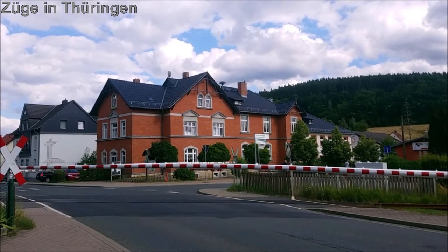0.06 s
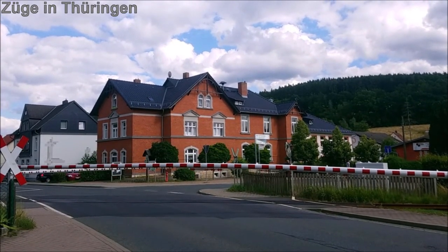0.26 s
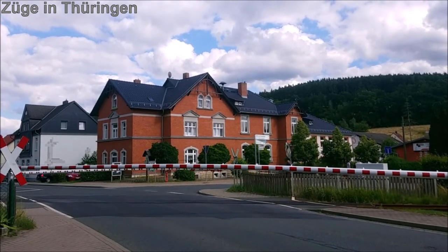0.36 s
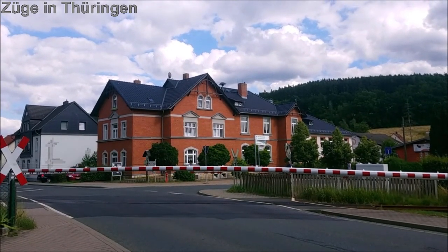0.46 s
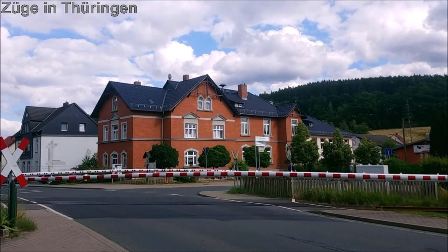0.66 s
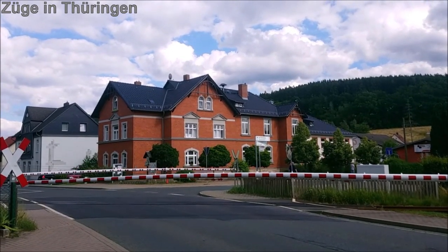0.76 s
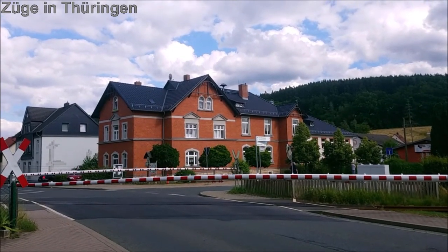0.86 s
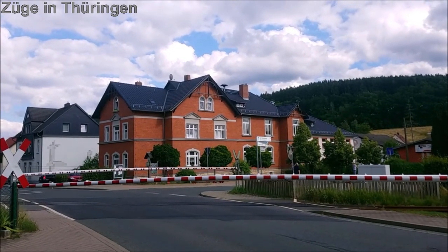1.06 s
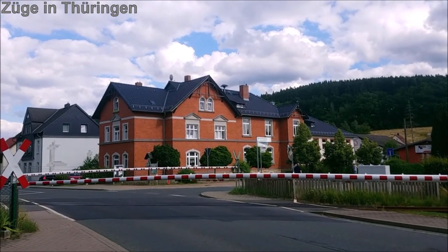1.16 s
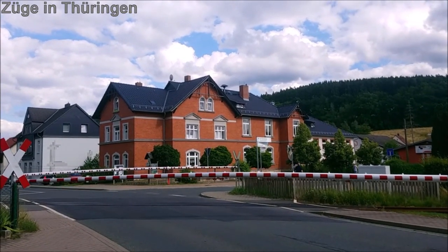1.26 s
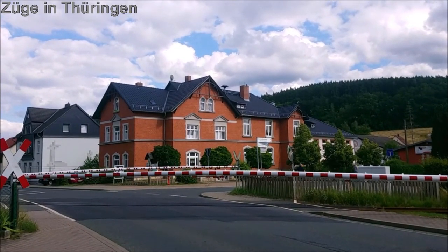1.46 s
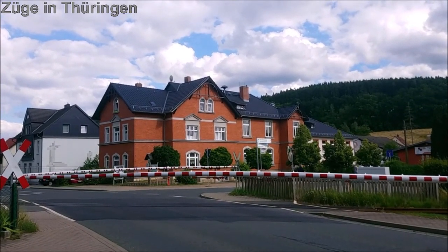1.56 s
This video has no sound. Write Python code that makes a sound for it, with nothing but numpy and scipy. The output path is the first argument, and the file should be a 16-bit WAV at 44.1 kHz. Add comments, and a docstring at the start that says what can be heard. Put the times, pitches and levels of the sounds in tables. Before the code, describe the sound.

A level crossing barrier comes down outdoors with hollow thuds, clacking joints and bell-like metal strikes. It lands with a clang, rattles and settles, with a short street echo over low wind and distant traffic.

```python
"""A street at a level crossing. The barrier comes down: its hollow boom flexes and thuds, slack linkage
joints clack, rubbing steel squeaks, and a loose steel rod is struck and rings like a bell. The boom lands
on its steel rest with a clang and sharp snaps, rattles and settles. House fronts answer with a short
diffuse echo; wind and far traffic rumble underneath."""
import sys
import numpy as np
from scipy import signal
from scipy.fft import rfft, irfft, next_fast_len
from scipy.io import wavfile
from scipy.ndimage import map_coordinates

SR = 44100
rng = np.random.default_rng(int(sys.argv[2]) if len(sys.argv) > 2 else 0)


def dump(signal):
    """Clip the signal to [-1, 1] and save it as 16-bit WAV at the path in sys.argv[1]."""
    limited = np.clip(np.atleast_2d(signal).T, -1, 1)
    pcm = np.round(limited * 32767).astype(np.int16)
    wavfile.write(sys.argv[1], SR, pcm)


N = 70560

# boom contacts on its rest: (time [s], level [dB])
LANDINGS = [(.799, -25), (0.8047, -19), (0.808, -21.5), (0.8144, -22.5)]
# phase of left ahead of right: (frequency [Hz], lead [rad])
LEFT_LEAD = [(100, -0.5), (800, 0.7), (1300, 1.6), (2400, 2), (4000, 1.5), (12000, -0.5)]


def amp(db):
    """Decibels to gain."""
    return 10 ** (np.asarray(db) / 20)


def unit(x):
    """Scale to rms 1."""
    return x / np.sqrt(np.mean(x ** 2) + 1e-20)


def along(points, hz):
    """Interpolate (Hz, value) points on a log frequency axis."""
    knots_hz, values = np.transpose(points)
    return np.interp(np.log(hz + 1), np.log(knots_hz + 1), values)


def clock():
    """Seconds at each sample."""
    return np.arange(N) / SR


def wobble(knots_per_s):
    """Smooth random curve."""
    return map_coordinates(rng.standard_normal(N // 8), [clock() * knots_per_s], mode="wrap")


def onset(rise_s):
    """Sine-squared attack."""
    return np.sin(np.pi / 2 * np.minimum(clock() / max(rise_s, 1e-4), 1)) ** 2


def until(length_s, contact_s=0.0032):
    """Gate: free ringing, then stopped by the next contact."""
    return np.clip(1 - (clock() - length_s) / contact_s, 0, 1)


def add(out, start_s, x):
    """Mix x into out from start_s on."""
    i = max(round(start_s * SR), 0)
    out[:, i:] += x[:, :N - i]


def shelves(hz, treble_db, bass_db):
    """Extra dB above 4 kHz and below 550 Hz."""
    return treble_db * (1 - 1 / (1 + (hz / 4000) ** 4)) + bass_db / (1 + (hz / 550) ** 8)


def stereo(hz, lead_rad):
    """Complex gains of the left and right channel."""
    # balance: (frequency [Hz], left over right [dB])
    balance = [(60, 5), (350, 4), (800, 2.5), (2000, 3.5), (4500, 0), (10000, -2.8)]
    return np.exp(np.array([[.5], [-.5]]) * (np.log(amp(along(balance, hz))) + 1j * lead_rad))


def noise(colour, treble_db=0, bass_db=0):
    """Coloured, partly coherent stereo noise; rms 1 before the shelves."""
    # left-right likeness: (frequency [Hz], coherence [0..1])
    coherence = [(60, 0.59), (130, 0.38), (300, 0.75), (750, 0.77), (1400, 0.34), (2400, 0.87),
                 (4000, 0.45), (12000, 0.034)]
    hz = np.fft.rfftfreq(N, 1 / SR)
    mid, side = rfft(rng.standard_normal((2, N)))
    width_rad = np.arccos(np.clip(along(coherence, hz), -1, 1)) / 2
    white = np.cos(width_rad) * mid + np.array([[1], [-1]]) * np.sin(width_rad) * side
    pair = white * amp(along(colour, hz)) * stereo(hz, along(LEFT_LEAD, hz))
    return irfft(pair * amp(shelves(hz, treble_db, bass_db)), N) / np.std(irfft(pair, N))


def tone(hz, lead_rad, drift_rad):
    """Phase-modulated stereo partial."""
    phase = 2 * np.pi * hz * clock() + drift_rad
    return np.sqrt(2) * np.imag(stereo(hz, lead_rad) * np.exp(1j * phase))


def burst(colour, t60_s, echo_db, treble_db=0, bass_db=0, chatter_db=0):
    """Dense modes die fast, then linger in the street, the treble least; chatter shakes the level."""
    # echo off the house fronts: (frequency [Hz], t60 [s])
    street = [(200, 1.8), (900, 1.67), (2400, 0.89), (5000, 0.73), (12000, 0.46)]
    hz, t, spectrum = signal.stft(noise(colour, treble_db, bass_db), SR, nperseg=256)
    direct = amp(-60 * t / t60_s)
    echo = amp(echo_db - 60 * t / along(street, hz)[:, None])
    decayed = signal.istft(spectrum * np.hypot(direct, echo), SR, nperseg=256)[1][:, :N]
    return decayed * unit(amp(chatter_db * wobble(410)))


def ring(modes, bass_db=0, stretch=1, scatter_db=1.5):
    """One blow on damped modes, each with random phase and level scatter."""
    out, t = np.zeros((2, N)), clock()[:N // 3]
    for hz, db, t60_s in modes:
        gain = amp(db + scatter_db * rng.standard_normal() + shelves(hz, 0, bass_db))
        phase = 2 * np.pi * (stretch * hz * t + rng.random())
        wave = gain * np.exp(1j * phase - np.log(1000) * t / t60_s)
        out[:, :len(t)] += np.imag(stereo(hz, along(LEFT_LEAD, hz)) * wave)
    return out


def outdoors(air_db=-49):
    """Steady air and a swelling rumble of wind and far traffic."""
    # noise spectra: (frequency [Hz], relative density [dB])
    air_colour = [(15, -42), (25, -9), (70, -16.5), (137, -2), (166, -19), (236, -5.5), (270, -9),
                  (503, -8), (560, -11.5), (624, -3.5), (677, -10.5), (2160, -15.5), (8140, -45.5),
                  (13600, -32), (16000, -44)]
    rumble_colour = [(25, -11.5), (45, -13.5), (70, -2), (115, -6.5), (170, -9.5), (300, -20), (1000, -40)]
    # rumble swell: (time [s], level [dB])
    swell = [(0, -54.5), (.2, -58), (.36, -46.5), (.5, -53.5), (.9, -53.5), (1.3, -47.5), (1.6, -54)]
    rumble_db = np.interp(clock(), *np.transpose(swell))
    return amp(air_db) * noise(air_colour) + amp(rumble_db) * noise(rumble_colour)


def squeaks(rise_s=0.0027, t60_s=0.036, waver_rad=0.45):
    """Rubbing steel holds one high mode for a moment."""
    # joint rubs: (time [s], length [s], frequency [Hz], level [dB])
    rubs = [(.555, 0.0086, 3600, -43), (0.68, 0.041, 3760, -30.5), (.709, 0.0098, 3840, -35),
            (1.134, 0.0032, 9770, -43.5), (1.135, 0.0055, 11100, -49)]
    out, t = np.zeros((2, N)), clock()
    for start_s, length_s, hz, db in rubs:
        release = np.exp(-np.log(1000) * np.maximum(t - length_s, 0) / t60_s)
        mode = tone(hz, lead_rad=1.0, drift_rad=waver_rad * wobble(225))
        add(out, start_s, amp(db) * onset(rise_s) * release * mode)
    return out


def snaps():
    """Hard steel-on-steel contacts give short bright cracks."""
    # contacts: (time [s], level [dB])
    contacts = [(0.546, -45), (0.6798, -30), (0.8022, -26), (0.809, -28), (0.8158, -41), (0.833, -36.5),
                (0.923, -41.5), (1.136, -32.5), (1.1455, -40), (1.161, -45)]
    # crack spectrum: (frequency [Hz], relative density [dB])
    colour = [(800, -15), (2000, -19), (4500, 1), (8000, -4), (11000, 0.5), (16000, -2)]
    out = np.zeros((2, N))
    for start_s, db in contacts:
        crack = burst(colour, t60_s=0.035, echo_db=-24, chatter_db=6.5)
        add(out, start_s, amp(db) * onset(0.001) * crack)
    return out


def linkage(modes_db=-6):
    """Slack joints clack and ring briefly as the boom sways."""
    # joint impacts: (time [s], level [dB], rise [s], treble shelf [dB])
    clacks = [(.206, -30.5, 0.0027, -1), (.221, -27.5, 0.0042, -10.5), (.368, -32, 0.0055, 4),
              (.378, -24, 0.003, -6.5), (.398, -35.5, .004, -13), (.548, -39.5, 0.0017, 2),
              (.626, -35, 0.0055, -6), (.655, -40, .004, -13), (1.089, -31.5, .008, -5),
              (1.136, -35, 0.0011, -1.5), (1.16, -48.5, 0.0024, 5), (1.213, -39, 0.011, -2)]
    # linkage modes: (frequency [Hz], level [dB], t60 [s])
    modes = [(2110, -5, 0.16), (2215, -0.5, 0.3), (2230, -18, 0.14), (2380, -9, 0.19), (2370, 3, .16),
             (4500, -19, 0.092)]
    # its dense modes: (frequency [Hz], relative density [dB])
    colour = [(150, -26), (700, -7), (1200, -9), (1500, -13), (1750, -3), (1930, -5), (2200, -1.5),
              (2430, 0), (2900, -10), (4400, -16), (6500, -28), (11000, -27), (16000, -37)]
    out = np.zeros((2, N))
    for start_s, db, rise_s, treble_db in clacks:
        dense = burst(colour, t60_s=0.19, echo_db=-10.5, treble_db=treble_db, chatter_db=1.5)
        add(out, start_s, amp(db) * onset(rise_s) * (dense + amp(modes_db) * ring(modes)))
    return out


def boom(modes_db=-4, dense_db=-3, supported_stretch=1.0277):
    """Each flex of the hollow boom rings its low modes, a little higher once it lies on its rest."""
    # flexes: (time [s], level [dB], rise [s], bass shelf [dB])
    thuds = [(.206, -34.5, .003, -0.5), (.221, -23.5, 0.011, -1.5), (.262, -33.5, 0.0049, -9),
             (.372, -37.5, 0.017, 14.5), (.387, -24.5, 0.019, 0), (.553, -34.5, 0.0033, -3),
             (.597, -34, 0.008, -7), (.613, -28, 0.0081, 1.5), (.806, -37.5, 0.0053, 14.5),
             (.828, -33.5, 0.003, 11), (.9, -34.5, 0.0035, -3), (1.091, -31.5, 0.0028, -2.5),
             (1.109, -27, 0.0046, 0.5), (1.144, -40, 0.0041, 1), (1.31, -41, .01, -17)]
    # free boom modes: (frequency [Hz], level [dB], t60 [s])
    modes = [(254.5, -17, 0.65), (282, -13.5, 0.17), (313.6, -11.5, 0.29), (372, -15.5, 0.24),
             (413, -8.5, 0.29), (461.2, -4.5, 0.19), (573, -15, 0.58), (649, -19, 0.31), (709.3, -3, 0.17),
             (777, -4.5, 0.18), (834, -2.5, 0.39), (856, -3.5, 0.18), (901, -6, 0.19), (1002, -14, 0.28),
             (1153, -12.5, 0.61)]
    # its dense modes: (frequency [Hz], relative density [dB])
    colour = [(60, -19.5), (190, -16), (255, -6), (470, -5.5), (570, -17), (820, 1), (1000, -7.5),
              (1300, -8), (2000, -12.5), (5000, -41)]
    out = np.zeros((2, N))
    for start_s, db, rise_s, bass_db in thuds:
        landed = start_s > LANDINGS[0][0]
        body = ring(modes, bass_db, stretch=supported_stretch if landed else 1)
        dense = burst(colour, t60_s=0.075, echo_db=-11.5, bass_db=bass_db)
        add(out, start_s, amp(db) * onset(rise_s) * (amp(modes_db) * body + amp(dense_db) * dense))
    return out


def landing():
    """The boom clangs on its rest, rattles, and rattles again softly after the rebound."""
    # steel rest modes: (frequency [Hz], level [dB], t60 [s])
    modes = [(1133, -7.5, 0.14), (1322, -3.5, 0.13), (1397, -3.5, .07), (1458, 2.5, 0.048), (1522, 2.5, .1),
             (1700, -8, .08), (1944, -12, 0.14), (2434, -16, 0.076)]
    # rattle impacts: (time [s], level [dB], rise [s], treble shelf [dB])
    rattles = [(0.7977, -25.5, 0.00052, -5), (0.8036, -25.5, 0.00091, 8.5), (.827, -21, .004, 1),
               (.843, -23.5, 0.0036, -5), (.863, -24, 0.0072, 1.5), (0.881, -21.5, 0.003, -2),
               (.902, -23, 0.0033, -2.5), (.918, -23.5, .003, 0.5), (.946, -26.5, 0.0072, 3),
               (.966, -24, 0.0035, -7), (.986, -29, 0.0037, -12), (1.289, -31.5, 0.0082, -8.5),
               (1.312, -31.5, .004, -4.5), (1.334, -36, 0.0043, -8), (1.366, -35.5, 0.0055, -11),
               (1.443, -37.5, 0.013, -13), (1.467, -37.5, 0.0014, -4.5)]
    # rattle spectrum: (frequency [Hz], relative density [dB])
    colour = [(120, -60), (280, -25), (450, -8.5), (680, -20.5), (900, -3), (1130, -7), (1400, -0.5),
              (1850, -7), (2400, 1), (3000, -11), (3900, -9), (7000, -28), (11000, -25.5), (16000, -32)]
    out = np.zeros((2, N))
    stops_s = [row[0] for row in LANDINGS[1:]] + [N / SR]
    for (start_s, db), stop_s in zip(LANDINGS, stops_s):
        add(out, start_s, amp(db) * onset(0.0007) * until(stop_s - start_s) * ring(modes))
    for start_s, db, rise_s, treble_db in rattles:
        rattle = burst(colour, t60_s=0.17, echo_db=-15, treble_db=treble_db, chatter_db=-0.5)
        add(out, start_s, amp(db) * onset(rise_s) * rattle)
    return out


def rod(buzz_rad_per_khz=0.12):
    """The steel rod rings like a bell and buzzes in its holder; each blow stops the earlier ring."""
    # blows: (time [s], level [dB], lowest mode offset [dB], excitation cutoff [Hz], click offset [dB])
    strikes = [(.323, -30.5, 0, 3900, -41), (.681, -17.5, -4.5, 12000, -15), (0.7747, -23, 8, 14000, -13)]
    # rod modes: (frequency [Hz])
    modes_hz = [1322, 2415, 3748, 5319, 7095, 9005, 9062, 11243, 13035]
    # same modes: (level [dB], t60 [s], left lead [rad])
    modes = [(-14, 0.24, 1.2), (0, 0.38, 3.55), (-18, 0.36, 1.15), (-19, 0.35, 1.85), (-24, 0.27, 1.95),
             (-23.5, 0.22, 1.3), (-37, 0.31, 2.1), (-21, 0.2, 0.7), (-22, 0.19, 1.6)]
    # contact click spectrum: (frequency [Hz], relative density [dB])
    colour = [(500, -6), (2000, 20), (4500, 1.5), (7000, -4), (11500, 7), (16000, 5)]
    out, t = np.zeros((2, N)), clock()
    stops_s = [row[0] for row in strikes[1:]] + [N / SR]
    for (start_s, db, lowest_db, cutoff_hz, click_db), stop_s in zip(strikes, stops_s):
        bell = np.zeros((2, N))
        for hz, (mode_db, t60_s, lead_rad) in zip(modes_hz, modes):
            gain = amp(mode_db + lowest_db * (hz == modes_hz[0])) / np.hypot(1, (hz / cutoff_hz) ** 2)
            buzz_rad = buzz_rad_per_khz * hz / 1000 * wobble(220)
            bell += gain * tone(hz, lead_rad, buzz_rad) * np.exp(-np.log(1000) * t / t60_s)
        click = amp(click_db) * burst(colour, t60_s=0.073, echo_db=-8.5)
        add(out, start_s, amp(db) * onset(0.00064) * (bell * until(stop_s - start_s) + click))
    return out


def scene():
    """The barrier in its street."""
    return boom() + linkage() + landing() + snaps() + rod() + squeaks() + outdoors()


def record(dry):
    """Brick-wall low-pass."""
    top_hz = 16100
    size = next_fast_len(N + SR // 4)
    passband = np.fft.rfftfreq(size, 1 / SR) < top_hz
    return irfft(rfft(dry, size) * passband, size)[:, :N]


dry = scene()
out = record(dry)
dump(out)
```